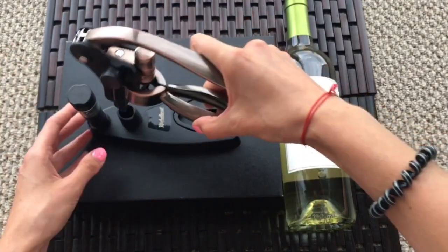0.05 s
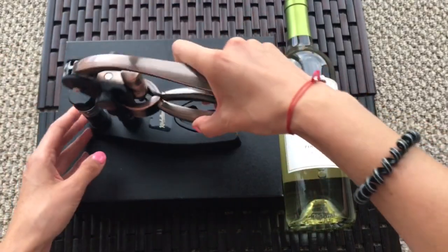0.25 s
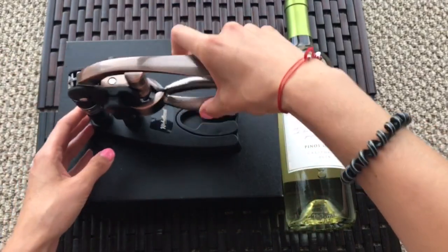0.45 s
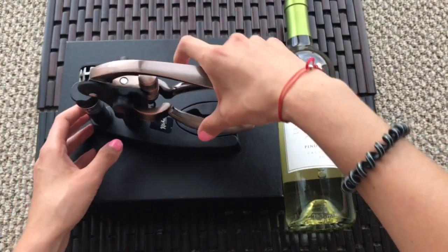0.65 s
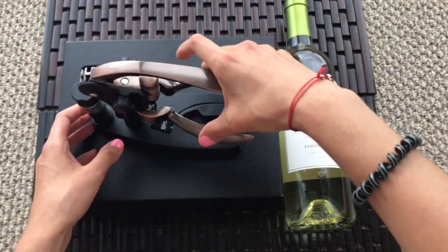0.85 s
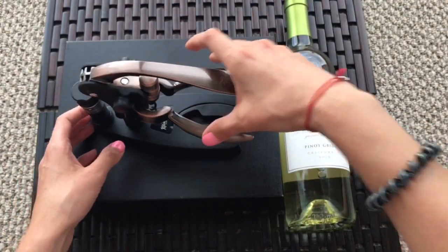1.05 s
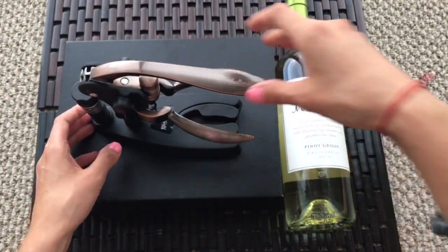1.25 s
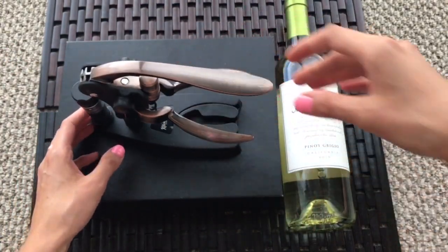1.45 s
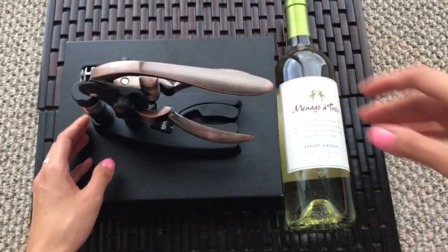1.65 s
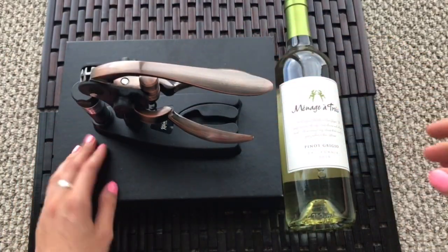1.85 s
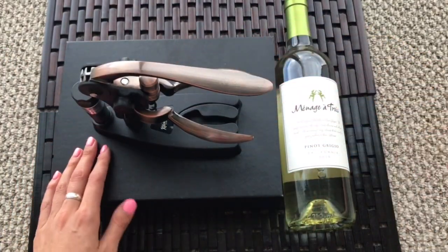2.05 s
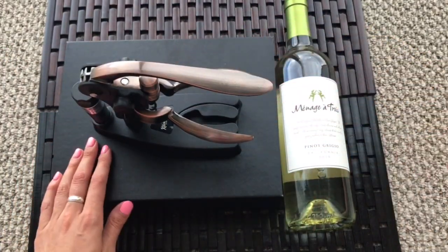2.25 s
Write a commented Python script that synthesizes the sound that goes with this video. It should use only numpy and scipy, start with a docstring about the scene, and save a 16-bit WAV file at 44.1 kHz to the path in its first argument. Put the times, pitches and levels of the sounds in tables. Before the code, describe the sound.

A metal wine opener is set into its stand on a hollow box. It clicks at about 0.2 seconds, then knocks three times by 0.4, each a hollow thump with a metallic clank. A faint ping follows at 0.5 and a small settling rattle near 0.6. From about 1.5 to 2.1 seconds, fingers slide off the lid with a very soft hiss in the quiet room.

```python
"""A click, three knocks and a settling rattle: a metal lever wine opener is set down in its stand
on a hollow box, in a quiet furnished room. Each contact thumps the box, clanks the opener,
chinks its thin metal parts and ticks at the point of touch.
A loose part pings faintly; later the fingers slide off the lid of the box with a soft hiss."""
import sys
import numpy as np
from scipy import signal
from scipy.fft import irfft
from scipy.io import wavfile

SR = 44100
rng = np.random.default_rng(int(sys.argv[2]) if len(sys.argv) > 2 else 0)


def file_out(sig):
    """Save sig as 16-bit WAV at sys.argv[1]."""
    # one column per channel
    cols = np.atleast_2d(sig).T
    # limit, then scale
    lim = np.clip(cols, -1, 1)
    pcm = np.round(lim * 32767).astype(np.int16)
    wavfile.write(sys.argv[1], SR, pcm)


N = 101429
TIME_S = np.arange(N) / SR
AGE_S = TIME_S[:SR // 2]   # time since a strike
FREQ_HZ = np.maximum(np.arange(N // 2 + 1) * SR / N, 1)


def from_db(db):
    """Decibels to gain."""
    return 10 ** (np.asarray(db) / 20)


def at_hz(table, hz):
    """Interpolate a table over log frequency."""
    freqs, values = np.array(table).T
    return np.interp(np.log(hz), np.log(freqs), values)


def at_time(start_s, x):
    """Place x at start_s in N samples."""
    return np.pad(x, (int(start_s * SR), N - len(x)))[:N]


def decay(t, t60, hold_s=0):
    """Envelope: hold, then fall 60 dB per t60."""
    return np.exp(-np.log(1000) * np.maximum(t - hold_s, 0) / t60)


def noise(gain):
    """Random-phase noise shaped by a gain per bin; rms 1."""
    x = irfft(gain * np.exp(2j * np.pi * rng.random(len(FREQ_HZ))), N)
    return x / np.sqrt(np.mean(x ** 2) + 1e-20)


def ring(modes, ratio=-1, spread_db=0, detune=0):
    """Struck modes as damped sines; mode k is scaled by ratio**k, so -1 alternates polarity."""
    out = np.zeros(len(AGE_S))
    for k, (hz, db, t60) in enumerate(modes):
        louder, higher = rng.standard_normal(2)
        t = AGE_S[AGE_S < t60]
        gain = ratio ** k * from_db(db + spread_db * louder)
        out[:len(t)] += gain * np.sin(2 * np.pi * hz * (1 + detune * higher) * t) * decay(t, t60)
    return out


def burst(spectrum, t60, hold_s=0, size=4096):
    """Dense damped modes struck at once: decaying noise, initial rms 1."""
    hz = np.maximum(np.arange(size // 2 + 1) * SR / size, 1)
    x = irfft(from_db(at_hz(spectrum, hz)) * np.exp(2j * np.pi * rng.random(len(hz))))
    return np.pad(x / x.std() * decay(AGE_S[:size], t60, hold_s), (0, len(AGE_S) - size))


# air spectrum: f/Hz, relative density/dB
AIR_SPECTRUM = [(12, -15), (20, 0.5), (32, -5), (85, -3.5), (149, -4.5), (276, -4), (335, -5.5), (375, -4),
                (620, -8.5), (916, -9.5), (1740, -14.5), (2570, -17.5), (15800, -21.5)]
def room_air(rms_db=-69):
    """Steady room air and hiss."""
    return from_db(rms_db) * noise(from_db(at_hz(AIR_SPECTRUM, FREQ_HZ)))


# each contact lands elsewhere and loads the modes differently
STRIKE_SCATTER = dict(spread_db=1.03, detune=0.0039)
CONTACT_HOLD_S = 0.0027

# box modes: f/Hz, relative level/dB, t60/s
BOX_MODES = [(180, -13.5, 0.083), (227, -5.5, 0.14), (264.5, 2.5, 0.091), (269, -2.5, 0.062),
             (324, -6.5, 0.14), (407.6, 3.5, 0.061), (435.5, -0.5, 0.073), (513.6, -12.5, 0.12),
             (599, -20, 0.11), (728, -6.5, 0.057), (734, -11.5, 0.12), (785.4, -11, 0.14),
             (835, -33.5, 0.081), (1015, -14, 0.078)]
# dense damped box modes: f/Hz, relative density/dB
THUD_SPECTRUM = [(60, -22), (130, -9.5), (200, -12), (270, 2), (420, 2), (570, -12), (760, -3.5),
                 (1200, -10.5), (3000, -35), (8000, -57)]
def box_thump(rise_s=0.0017, linger_db=-24.5, linger_t60_s=0.3, thud_db=3):
    """The lid gives under the blow and the box resonates; a weak share of each mode rings on."""
    modes = ring(BOX_MODES, ratio=1, **STRIKE_SCATTER)
    linger = ring([(hz, db + linger_db, linger_t60_s) for hz, db, _ in BOX_MODES], ratio=0.97)
    thud = from_db(thud_db) * burst(THUD_SPECTRUM, t60=0.037)
    rise = 1 - np.exp(-AGE_S / rise_s)
    return rise * (modes + linger + thud)


# opener modes: f/Hz, relative level/dB, t60/s
OPENER_MODES = [(950, -10.5, .035), (1084, -18, 0.066), (1210, -9, 0.039), (1443, -18.5, 0.084),
                (1799, -16, 0.077), (1932, -17, .07), (2144, -15, .07), (2334, -7.5, 0.035),
                (2490, 2, 0.0071), (2400, -16, 0.023), (3090, -14, 0.026), (5100, -25, 0.055),
                (5310, -31, .1), (5840, -30, 0.12)]
# dense damped opener modes: f/Hz, relative density/dB
CLANK_SPECTRUM = [(300, -29), (700, 5), (1400, -3.5), (2400, 5.5), (2900, -15.5), (3600, -39), (5200, -10),
                  (6500, -53), (16000, -40)]
def opener_clank():
    """The struck metal body rings over a short burst of dense modes."""
    modes = ring(OPENER_MODES, **STRIKE_SCATTER)
    return modes + burst(CLANK_SPECTRUM, t60=0.0097, hold_s=CONTACT_HOLD_S)


# tick spectrum: f/Hz, relative density/dB
TICK_SPECTRUM = [(1500, 7.5), (3500, -4.5), (4400, -3.5), (5300, -1.5), (6400, -12), (8300, -4.5),
                 (9400, -10.5), (10600, -7), (11500, -10.5), (12400, -18), (15500, -26)]
def contact_tick():
    """Hard surfaces meet in a brief bright burst."""
    return burst(TICK_SPECTRUM, t60=0.014, hold_s=CONTACT_HOLD_S)


# thin metal modes: f/Hz, relative level/dB, t60/s
CHINK_MODES = [(5040, -5.5, .018), (5500, -4, 0.019), (7360, -12.5, 0.061), (8530, -9.5, 0.037),
               (9620, -4, 0.019), (10340, -1.5, .018), (10520, -1.5, 0.012), (10870, -5, 0.026),
               (11500, -5, 0.015), (15500, -14, .014)]
def metal_chink():
    """Thin metal parts ring high and short."""
    return ring(CHINK_MODES, **STRIKE_SCATTER)


# opener meets stand: t/s, thump gain/dB, clank gain/dB, tick gain/dB, chink gain/dB
STAND_CONTACTS = [(.1012, -64.5, -71.5, -85, -80), (.2228, -48, -42, -46.5, -41.5),
                  (0.2497, -33.5, -31, -35, -63), (0.2529, -37.5, -59, -39, -50),
                  (0.2629, -40.5, -54, -55, -72), (.2730, -60, -51, -53, -73),
                  (0.2892, -46.5, -54, -57.5, -73), (.3296, -54, -45, -68, -80),
                  (0.331, -33.5, -58, -61, -81), (0.3411, -47, -50, -61, -72),
                  (0.347, -63, -48.5, -79, -75), (0.3839, -44, -41, -45, -44),
                  (0.3846, -30.5, -41, -39, -64), (0.3892, -37, -53, -46, -66),
                  (.4010, -39.5, -45.5, -77, -79), (.4460, -56, -66, -78, -82),
                  (.6064, -54.5, -58.5, -56, -57), (.6098, -54.5, -58.5, -65, -59),
                  (.6230, -67, -65.5, -69, -76), (.6470, -68.5, -72, -74, -84),
                  (1.8989, -66, -84, -88, -92)]
def contacts(low_cut_hz=170):
    """Each contact mixes the four sounds in its own proportions; a small box radiates no deep bass."""
    out = np.zeros(N)
    for start_s, thump_db, clank_db, tick_db, chink_db in STAND_CONTACTS:
        thump = from_db(thump_db) * box_thump()
        clank = from_db(clank_db) * opener_clank()
        tick = from_db(tick_db) * contact_tick()
        chink = from_db(chink_db) * metal_chink()
        out += at_time(start_s, thump + clank + tick + chink)
    low_cut = signal.butter(2, low_cut_hz, "high", fs=SR, output="sos")
    return signal.sosfilt(low_cut, out + 1e-18)


# faint taps: t/s, f/Hz, level/dB, t60/s
FAINT_TAPS = [(.1035, 734, -54, 0.035), (0.656, 1113, -53.5, 0.028)]
def taps():
    """Each tap rings at one pitch."""
    return sum(at_time(start_s, ring([(hz, db, t60)])) for start_s, hz, db, t60 in FAINT_TAPS)


# reverberation gain: f/Hz, level/dB
REVERB_LEVEL = [(150, -13.5), (400, -10.5), (1000, -8.5), (2300, -10), (5000, -12), (11000, -13.5)]
# reverberation decay: f/Hz, t60/s
REVERB_T60 = [(150, .4), (500, 0.38), (2000, 0.36), (6000, 0.4), (14000, 0.41)]
def reverb(x, delay_s=0.005, early_db=-9, early_t60_s=0.044):
    """Early reflections from table and floor, and a diffuse tail that dies band by band."""
    edges_hz = np.geomspace(80, 16000, 13)
    response = np.zeros(N)
    for low, high in zip(edges_hz, edges_hz[1:]):
        hz = np.sqrt(low * high)
        band = noise((FREQ_HZ >= low) & (FREQ_HZ < high))
        for db, t60 in ((0, at_hz(REVERB_T60, hz)), (early_db, early_t60_s)):
            part = band * decay(TIME_S, t60)
            unity_gain = np.sqrt(2 * (high - low) / SR / np.sum(part ** 2))
            response += from_db(at_hz(REVERB_LEVEL, hz) + db) * unity_gain * part
    return signal.fftconvolve(x, at_time(delay_s, response))[:N]


# loose part modes: f/Hz, relative level/dB, t60/s
PING_MODES = [(4533, 0, .06), (4470, -6, .04), (6050, -5, .035), (8323, -11, .11), (8800, -6, .04),
              (10480, -8, .09)]
# loose part strikes: t/s, gain/dB
PING_STRIKES = [(0.484, -59.5), (0.531, -71.5)]
def loose_part():
    """A loose part pings faintly in its high modes."""
    ping = ring(PING_MODES)
    return sum(at_time(start_s, from_db(db) * ping) for start_s, db in PING_STRIKES)


# slides on the lid: peak t/s, sigma/s, centre f/Hz, sigma/octaves, level/dB
FINGER_SLIDES = [(1.62, 0.21, 10800, 0.2, -77), (1.8, 0.13, 9000, 0.64, -73), (1.816, .07, 1100, 0.6, -78),
                 (2.037, 0.044, 8400, 0.093, -75.5)]
def fingers():
    """Skin slides on the lid: soft swells of friction hiss."""
    out = np.zeros(N)
    for peak_s, sigma_s, hz, sigma_oct, db in FINGER_SLIDES:
        swell = np.exp(-0.5 * ((TIME_S - peak_s) / sigma_s) ** 2)
        band = np.exp(-0.5 * (np.log2(FREQ_HZ / hz) / sigma_oct) ** 2)
        out += from_db(db) * swell * noise(band)
    return out


def scene():
    """Mono mix: air, knocks with their reverberation, fingers."""
    knocks = contacts() + taps() + loose_part()
    return (room_air() + knocks + reverb(knocks) + fingers())[None]


def record(dry):
    """Steep low-pass at 15.8 kHz."""
    return signal.sosfilt(signal.ellip(12, 0.1, 70, 15800, fs=SR, output="sos"), dry)


dry = scene()
out = record(dry)
file_out(out)
```